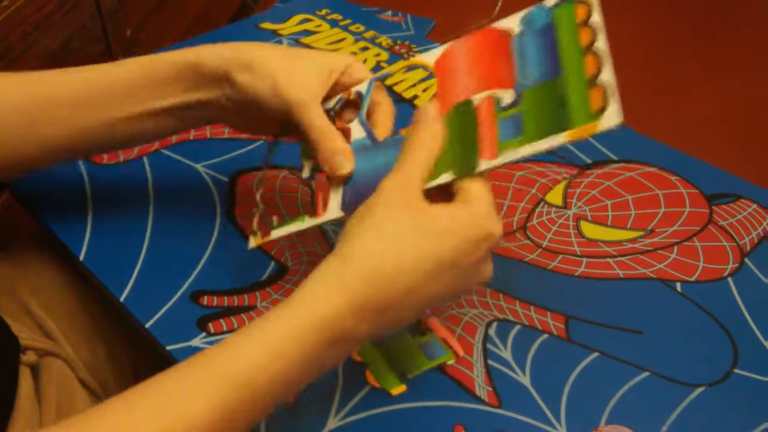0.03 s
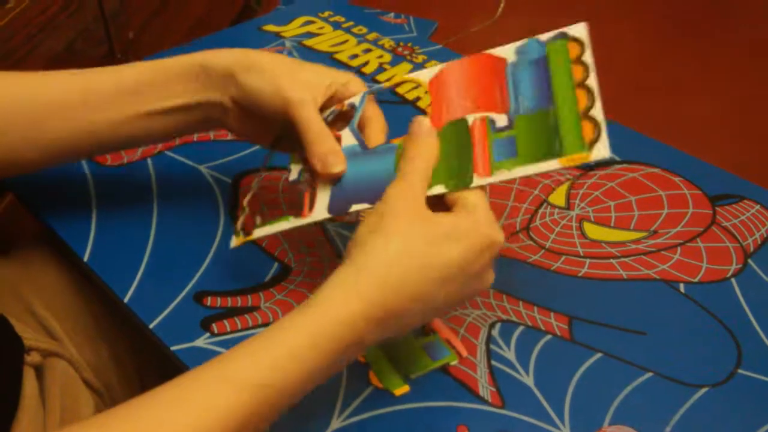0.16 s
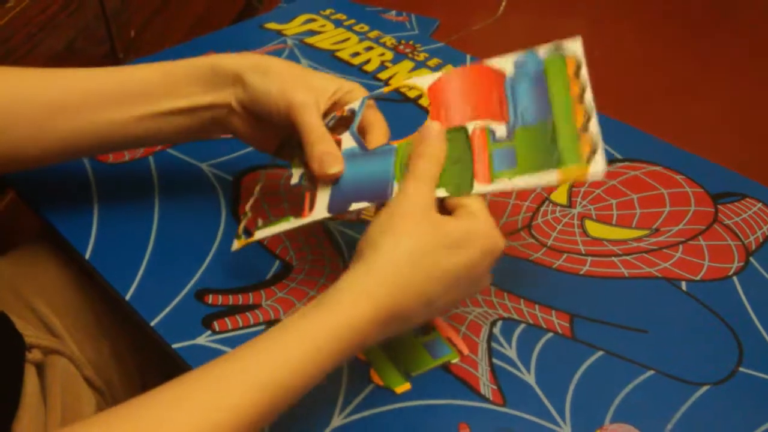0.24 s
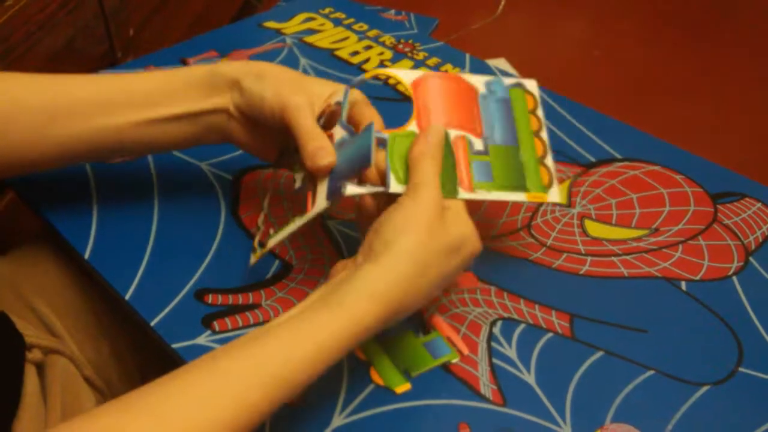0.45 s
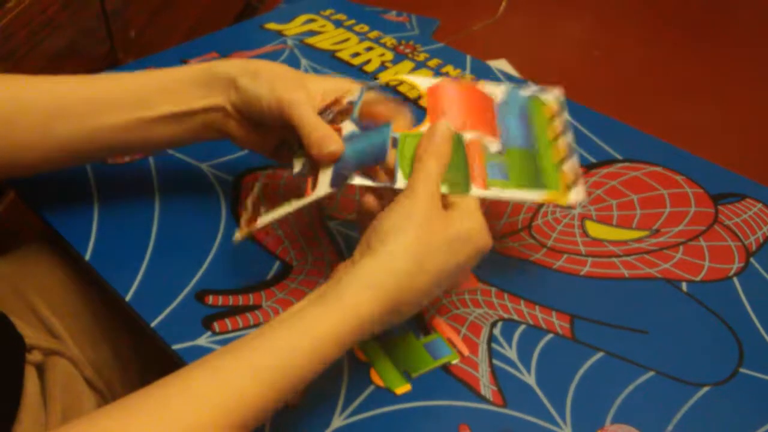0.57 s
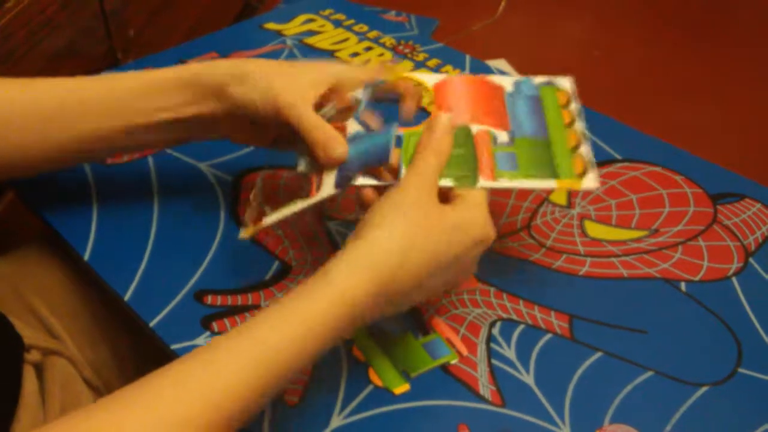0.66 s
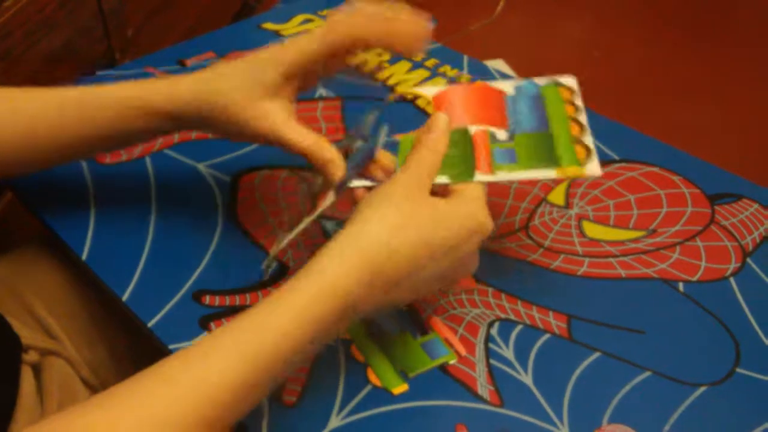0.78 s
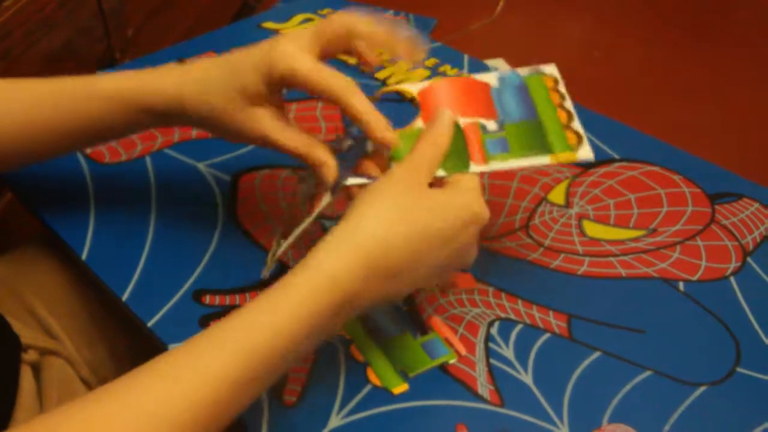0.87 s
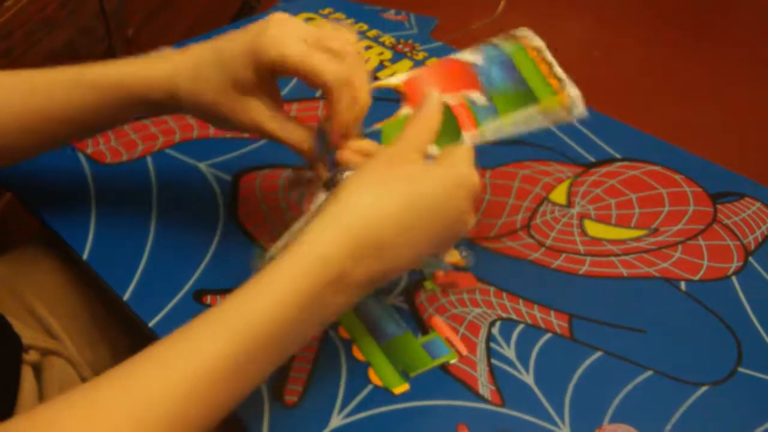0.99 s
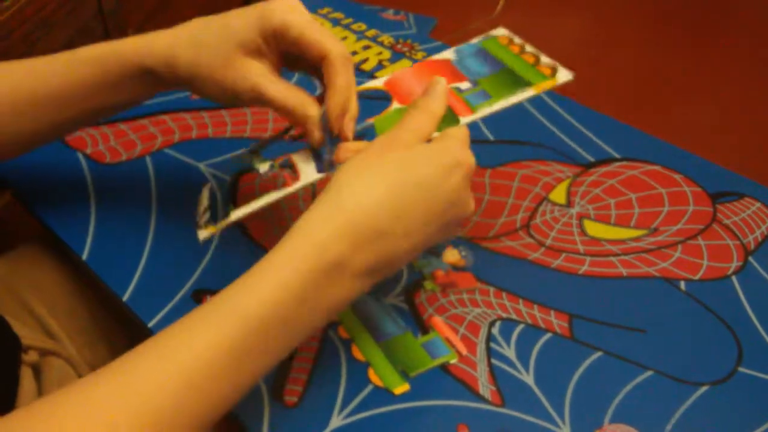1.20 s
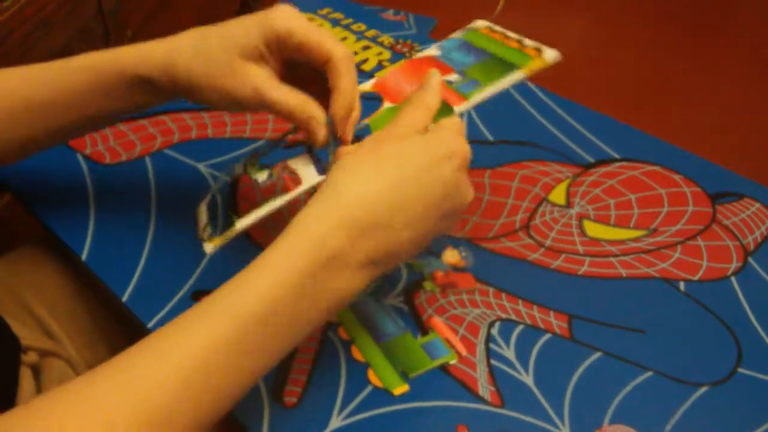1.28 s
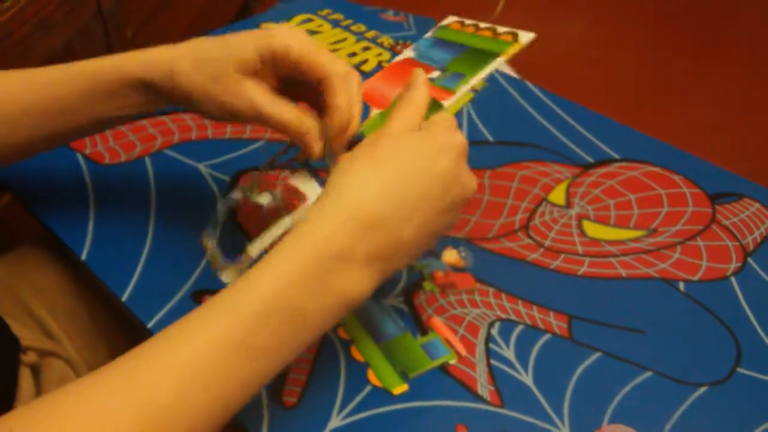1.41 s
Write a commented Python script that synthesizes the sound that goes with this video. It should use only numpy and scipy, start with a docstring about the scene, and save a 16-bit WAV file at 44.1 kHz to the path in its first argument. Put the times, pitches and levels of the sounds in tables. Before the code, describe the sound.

A cardboard puzzle sheet snaps dryly as fingers press out a piece, close by in a small room. Small clicks lead to two sharp cracks at about 0.2 and 0.35 seconds, over faint rubbing. The piece flips free with a hollow tap near 0.75 seconds. A soft table thud comes at 0.9, with more snaps until 1 second. Two lighter clicks follow around 1.3 and 1.4 seconds.

```python
"""Pressing a piece out of a cardboard puzzle sheet.

Fingers rub and bend the sheet over a table in a small room. Fibres and tabs give way in dry snaps,
and the freed piece flips with a hollow tap. The card bumps the table, once with a clear soft thud,
and the piece rattles. The room answers each snap with a short bright tail."""
import sys
import numpy as np
from scipy import signal
from scipy.fft import rfft, irfft
from scipy.io import wavfile
from scipy.ndimage import uniform_filter1d

SR = 44100
rng = np.random.default_rng(int(sys.argv[2]) if len(sys.argv) > 2 else 0)


def dump(signal):
    """Clip the signal to [-1, 1] and save it as 16-bit WAV at the path in sys.argv[1]."""
    limited = np.clip(np.atleast_2d(signal).T, -1, 1)
    pcm = np.round(limited * 32767).astype(np.int16)
    wavfile.write(sys.argv[1], SR, pcm)


N = 63945
FFT_SIZE = 4096
HZ = np.fft.rfftfreq(FFT_SIZE, 1 / SR)
BODY_SHELF = 1 / (1 + (HZ / 3300) ** 4)  # low range, where a broad area of card radiates


def amp(db):
    return 10 ** (np.asarray(db) / 20)


def unit_rms(x):
    return x / np.sqrt(np.mean(x ** 2) + 1e-20)


def curve(points, hz=HZ):
    """Interpolate (hz, value) points over log frequency."""
    knots_hz, values = np.transpose(points)
    return np.interp(np.log(hz + 1), np.log(knots_hz + 1), values)


def bell(centre_hz, width_octaves):
    return np.exp(-.5 * (np.log2((HZ + 1) / centre_hz) / width_octaves) ** 2)


def resonances(peaks, cutoff_hz, steepness=3.77):
    """Gain in dB of resonant peaks, bass rolled off."""
    power = sum(amp(db) ** 2 / (1 + abs(2 * (HZ - hz) / width_hz) ** steepness)
                for hz, width_hz, db in peaks)
    return 10 * np.log10(power * HZ ** 8 / (HZ ** 8 + cutoff_hz ** 8) + 1e-6)


def add(mix, start_s, sound):
    part = mix[..., max(round(start_s * SR), 0):][..., :sound.shape[-1]]
    part += sound[..., :part.shape[-1]]


def with_send(sound, room_db):
    """Rows: direct sound, room send."""
    return np.array([sound, amp(room_db) * sound])


def colour(x, gain_db):
    """Minimum-phase filter; gain_db over HZ."""
    log_gain = np.log(amp(np.r_[gain_db, gain_db[-2:0:-1]]))
    taps = np.fft.ifft(np.exp(np.conj(signal.hilbert(log_gain)))).real
    return signal.fftconvolve(x, taps[:FFT_SIZE // 2])


def stroke(noise, length_s, shape_db, rise_share=0.13):
    """Coloured noise: quick swell, slower release."""
    progress = np.linspace(0, 1, int(length_s * SR))
    envelope = np.minimum(progress / rise_share, 1) * np.sqrt(1 - progress)
    return envelope * unit_rms(colour(noise, shape_db)[FFT_SIZE:FFT_SIZE + len(progress)])


def crack(fade_s, shape_db, rise_s=0.00018):
    """Burst of tearing fibres with the energy of 1 ms at unit level."""
    t = np.arange(FFT_SIZE) / SR
    envelope = (1 - np.exp(-(t / rise_s) ** 2)) * np.exp(-t / fade_s)
    burst = envelope * rng.standard_normal(FFT_SIZE)
    for _ in range(3):  # flatten the spectrum, restore the envelope
        burst = irfft(np.exp(1j * np.angle(rfft(burst))))
        burst *= envelope / np.sqrt(abs(uniform_filter1d(burst ** 2, size=24)) + 1e-12)
    burst = colour(burst, shape_db)
    return burst / np.linalg.norm(burst) * np.sqrt(SR / 1000)


def ring(modes, rise_s):
    """Decaying modes, started by a smooth push."""
    t = np.arange(SR // 2) / SR
    push = np.sin(np.pi / 2 * np.minimum(t / rise_s, 1)) ** 2
    return push * sum(amp(db - 60 * t / t60_s) * np.sin(2 * np.pi * hz * t) for hz, db, t60_s in modes)


def room_tone(level_db=-80.5):
    """Faint steady rumble and hiss."""
    # background spectrum: freq_hz, gain_db
    spectrum = [(25, 2), (70, 6), (160, 4), (300, 5), (450, 1.5), (600, -14), (1000, -4.5), (2000, -4),
                (6000, -8.5), (8000, -3.5), (11000, -4.5), (15500, 0), (16500, -36)]
    noise = colour(rng.standard_normal(N + FFT_SIZE), curve(spectrum))
    return amp(level_db) * unit_rms(noise[FFT_SIZE:FFT_SIZE + N])


def finger_rubs(slips_per_s=6000, spread_db=2.5):
    """Tiny slips of skin and card edges merge into a rustle."""
    # strokes: start_s, length_s, level_db, body_db, room_db
    rubs = [(0.0, 0.017, -68, 8, -1.5), (0.031, 0.0088, -74, -9, 10.5), (0.057, 0.2, -65.5, 0.5, 4.5),
            (0.305, 0.12, -60.5, 1.5, 3), (.550, 0.025, -58.5, -2, -10), (0.57, 0.018, -67, 2, 3.5),
            (.663, 0.015, -55, 10, 0), (.692, 0.027, -58, 14, -1.5), (0.773, 0.093, -66.5, -11, -39),
            (0.928, 0.039, -54, 11, 1.5), (1.005, 0.1, -62, 11, -6), (1.129, 0.083, -71.5, -0.5, 0),
            (1.322, 0.096, -71, 4, -2), (1.415, .05, -63.5, 2, -16.5)]
    # friction spectrum: freq_hz, gain_db
    spectrum = [(100, -16.5), (500, -9.5), (1000, -7), (3000, -14), (5500, 2), (8000, -4.5), (11200, 11.5),
                (13500, 3), (15600, 1.5), (16500, -20.5)]
    out, count = np.zeros((2, N)), SR // 3
    for start_s, length_s, level_db, body_db, room_db in rubs:
        slips = rng.standard_normal(count) * amp(spread_db * np.minimum(rng.exponential(1, count), 4))
        slips *= rng.random(count) < slips_per_s / SR
        rustle = stroke(slips, length_s, curve(spectrum) + body_db * BODY_SHELF)
        add(out, start_s, with_send(amp(level_db) * rustle, room_db))
    return out


def hum():
    """A faint narrow noise band comes and goes."""
    # swells: start_s, length_s, level_db
    swells = [(.065, 0.28, -81.5), (.215, 0.18, -76.5), (.555, 0.094, -79)]
    # hum band: centre_hz, width_hz, gain_db
    band = [(491.4, 49, 4)]
    shape_db = resonances(band, cutoff_hz=300)
    out = np.zeros(N)
    for start_s, length_s, level_db in swells:
        add(out, start_s, amp(level_db) * stroke(rng.standard_normal(SR // 3), length_s, shape_db))
    return out


def fibre_snaps(ripple_db=2.5, ripple_step_hz=450):
    """Fibres break and the nearby card rings briefly; random ripple makes each spot differ."""
    # snaps: start_s, level_db, fade_s, body_db, flex_hz, flex_db, crisp_db, room_db
    snaps = [ (.0720, -43.5, 0.00085, 1.5, 1910, 6.5, 3.5, -8),
             (0.1098, -48.5, .0008, -5, 6030, 7, 0, -6.5), (0.1476, -52.5, 0.0017, -3, 8050, -13, -7, 0.5),
             (.1546, -39.5, .0008, 3.5, 6200, 10.5, 11.5, -8),
             (0.1842, -42.5, 0.00077, -9, 6040, 20, 19, -15),
             (0.3224, -34.5, 0.00079, -4, 6530, 3, 7.5, -0.5),
             (.3340, -34.5, .0014, -8.5, 5900, 11, 2, -18.5), (0.6027, -59.5, 0.0018, 8, 5540, 7, 8, -0.5),
             (.6480, -60, 0.0017, -13, 6000, 4, 2, 8), (0.7113, -49.5, 0.0014, -2, 5030, 20, 10, -36),
             (0.9068, -50, .0022, 6.5, 1850, 15.5, 9.5, 0.5),
             (0.9255, -32, 0.0029, 11, 5600, 10, 8.5, -6.5),
             (0.9931, -32.5, 0.00053, 16.5, 5500, -9, 20, -8.5),
             (1.1074, -52.5, 0.0012, 6.5, 5500, 2, 6, -2), (1.4066, -44.5, .0008, -4.5, 5430, 1, 8, -3.5)]
    # snapping card spectrum: freq_hz, gain_db
    spectrum = [(100, -27), (500, -12), (900, -18.5), (1900, -6), (2800, -8.5), (5000, -2), (7500, 1.5),
                (10500, 4), (13000, 5.5), (15500, 0.5), (16500, -20.5)]
    knots_hz = np.arange(0, SR / 2 + ripple_step_hz, ripple_step_hz)
    out = np.zeros((2, N))
    for start_s, level_db, fade_s, body_db, flex_hz, flex_db, crisp_db, room_db in snaps:
        shape_db = curve(spectrum) + body_db * BODY_SHELF
        shape_db += flex_db * bell(flex_hz, 0.1) + crisp_db * bell(11150, 0.12)
        shape_db += ripple_db * np.interp(HZ, knots_hz, rng.standard_normal(len(knots_hz)))
        add(out, start_s, with_send(amp(level_db) * crack(fade_s, shape_db), room_db))
    return out


def sheet_bends():
    """The flexing sheet gives a dull murmur."""
    # bends: start_s, length_s, level_db
    bends = [(.105, 0.011, -86), (0.558, 0.069, -85.5), (0.634, 0.074, -76.5), (0.6694, 0.012, -56.5),
             (0.679, 0.033, -67)]
    # murmur spectrum: freq_hz, gain_db
    spectrum = [(40, -21.5), (80, -9.5), (160, 4), (300, -4), (500, 5), (950, 1), (1500, -8.5), (2200, -28),
                (8000, -57)]
    out = np.zeros((2, N))
    for start_s, length_s, level_db in bends:
        murmur = stroke(rng.standard_normal(SR // 3), length_s, curve(spectrum))
        add(out, start_s, with_send(amp(level_db) * murmur, room_db=-12.5))
    return out


def card_breaks():
    """Four larger breaks, each ringing its own spot on the sheet."""
    # resonances per spot: centre_hz, width_hz, gain_db
    crease = [(766, 110, -22), (1110, 500, -24), (1700, 450, -28.5), (2375, 300, -23.5), (3450, 880, -23),
              (4540, 390, -19), (6240, 1700, -16), (8660, 360, -11.5), (9560, 320, -10.5), (10700, 700, -1),
              (11940, 610, -4.5), (13500, 1630, -17), (15300, 560, -16.5)]
    tab = [(1080, 170, -22.5), (1650, 330, -25.5), (2660, 670, -14.5), (3870, 170, -13), (4500, 990, -12),
           (5720, 1040, -3), (6390, 600, 1.5), (7820, 370, -2.5), (10000, 2700, -8), (10840, 1000, -3),
           (12100, 3600, -3.5), (13800, 3000, -11.5)]
    catch = [(753, 100, -3.5), (1090, 210, -7.5), (2020, 630, -7), (3400, 1700, -13), (5420, 710, 2),
             (8350, 3000, -8.5), (11300, 1100, -2.5), (14800, 1700, -16)]
    flick = [(1080, 450, -12), (1920, 500, -4.5), (3300, 980, -1), (4430, 1000, 3), (6180, 1470, 0),
             (8740, 3500, -10), (11070, 1700, -1), (14500, 3200, -7)]
    out = np.zeros((2, N))

    def break_at(spot, start_s, level_db, fade_s, room_db):
        shape_db = resonances(spot, cutoff_hz=715)  # below this, air slips round the card
        add(out, start_s, with_send(amp(level_db) * crack(fade_s, shape_db), room_db))

    break_at(crease, start_s=0.2097, level_db=-20, fade_s=0.00059, room_db=-10)
    break_at(tab, start_s=0.3495, level_db=-17, fade_s=0.0015, room_db=-7)
    break_at(catch, start_s=0.9874, level_db=-30.5, fade_s=0.0018, room_db=-8.5)
    break_at(flick, start_s=1.279, level_db=-42, fade_s=0.0016, room_db=0.5)
    return out


def table_bumps():
    """The card nudges the table's low modes into a soft thud."""
    # table modes: freq_hz, level_db, t60_s
    modes = [(81.5, -39, 0.21), (127, -43.5, 0.14), (150, -40.5, 0.18), (210, -50.5, 0.133)]
    # contacts: start_s, gain_db
    bumps = [(.245, -29.5), (.742, -28), (0.905, 0), (1.014, -22)]
    thud = ring(modes, rise_s=0.029)
    out = np.zeros((2, N))
    for start_s, gain_db in bumps:
        add(out, start_s, with_send(amp(gain_db) * thud, room_db=-19))
    return out


def freed_piece(flip_s=0.7411, rattle_s=0.933, damped_after_s=0.015):
    """The piece flips free with a tick and a hollow tap that a finger stops; later it rattles once."""
    # tick spectrum: freq_hz, gain_db
    spectrum = [(100, -20), (400, -13.5), (620, 4.5), (780, -8), (1000, -17), (1250, 1), (1700, 5.5),
                (2100, 3.5), (2700, 2.5), (3600, 0), (4600, 11), (5700, -2.5), (6500, 3.5), (8500, -10),
                (11000, -4), (16000, -23)]
    # piece modes: freq_hz, level_db, t60_s
    modes = [(199, -58.5, 0.13), (752, -43, 0.11), (791.5, -44, 0.23), (1425, -54, 0.13), (1570, -54, 0.12),
             (1760, -50.5, 0.077), (2890, -44.5, 0.013), (4920, -50, 0.014)]
    tick = amp(-35) * crack(fade_s=0.005, shape_db=curve(spectrum))
    free_ring = ring(modes, rise_s=0.0015)
    t = np.arange(len(free_ring)) / SR
    tap = with_send(free_ring / (1 + (t / damped_after_s) ** 10), room_db=-5.5)
    out = np.zeros((2, N))
    add(out, flip_s, with_send(tick, room_db=-8))
    add(out, flip_s, tap)
    add(out, rattle_s, amp(-9.5) * tap)
    return out


def room_reverb(send, build_s=0.0024):
    """Early reflections and a dense tail that dies sooner in the treble."""
    # tail decay: freq_hz, t60_s
    decay = [(100, 0.35), (500, 0.29), (1500, 0.33), (3500, 0.31), (5600, 0.29), (7500, 0.26),
             (11000, 0.24), (16000, 0.18)]
    # tail spectrum: freq_hz, gain_db
    spectrum = [(100, 15.5), (750, -5), (1100, 3.5), (1900, 0.5), (3000, 2), (4800, -1.5), (5700, -0.5),
                (6500, -4.5), (9000, 0), (10700, -3), (12000, -5.5), (14000, -3.5), (16000, 2)]
    # early reflections: delay_s, gain
    echoes = [(.0034, 0.34), (0.015, 0.11), (0.015, .18), (0.017, 0.18)]
    hz, t, bands = signal.stft(rng.standard_normal(SR // 2), SR, nperseg=256)
    bands *= amp(curve(spectrum, hz)[:, None] - 60 * t / curve(decay, hz)[:, None])
    tail = signal.istft(bands, SR, nperseg=256)[1]
    tail *= 1 - np.exp(-np.arange(len(tail)) / SR / build_s)
    tail /= np.linalg.norm(tail)
    for delay_s, gain in echoes:
        add(tail, delay_s, np.array([gain]))
    return signal.fftconvolve(send, tail)[:N]


def scene():
    """Card close by, room behind it; mono."""
    card = card_breaks() + fibre_snaps() + freed_piece() + finger_rubs() + sheet_bends()
    direct, send = card + table_bumps()
    return (direct + room_reverb(send) + room_tone() + hum())[None]


def record(dry):
    """Band limit: 58 Hz to 16.4 kHz."""
    low_cut = signal.butter(4, 58, "high", fs=SR, output="sos")
    high_cut = signal.firwin(511, 16400, window=("kaiser", 9), fs=SR)
    return signal.oaconvolve(signal.sosfilt(low_cut, dry), high_cut[None], "same")


dry = scene()
out = record(dry)
dump(out)
```